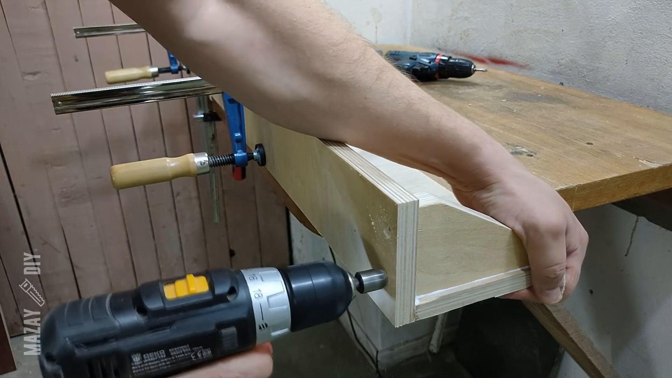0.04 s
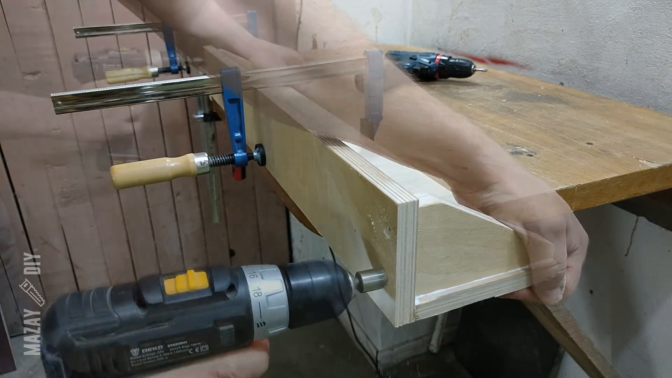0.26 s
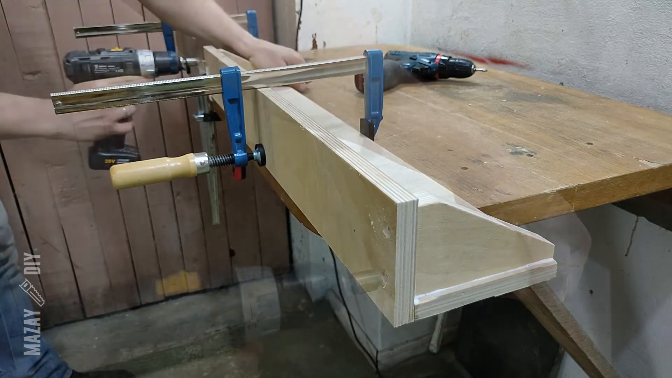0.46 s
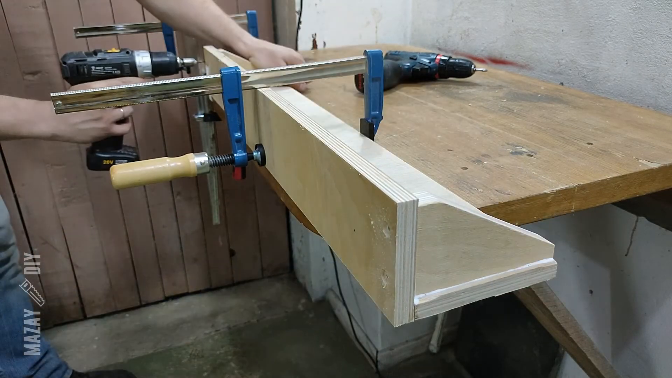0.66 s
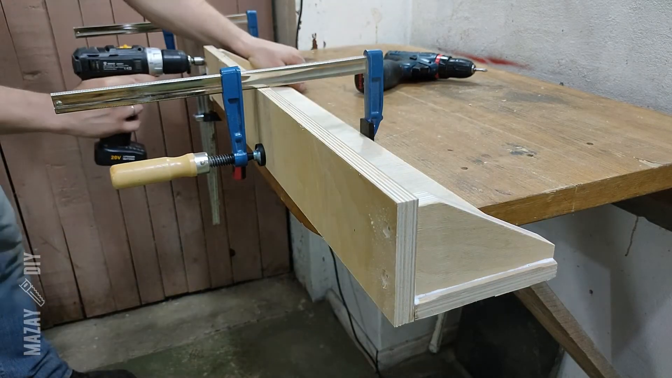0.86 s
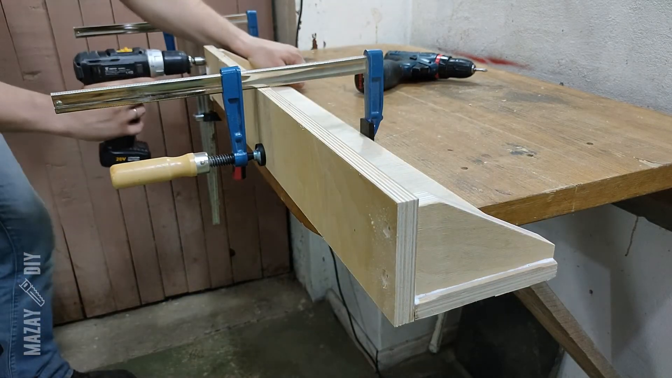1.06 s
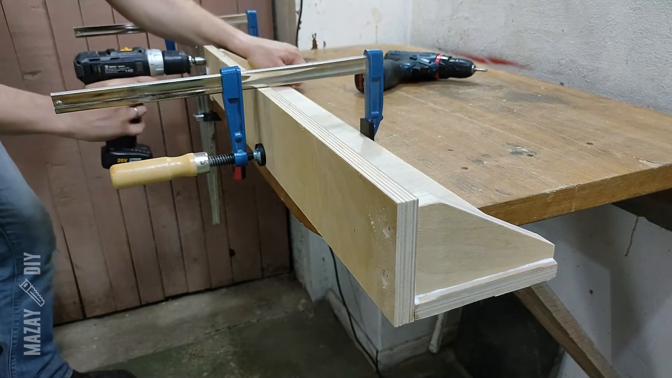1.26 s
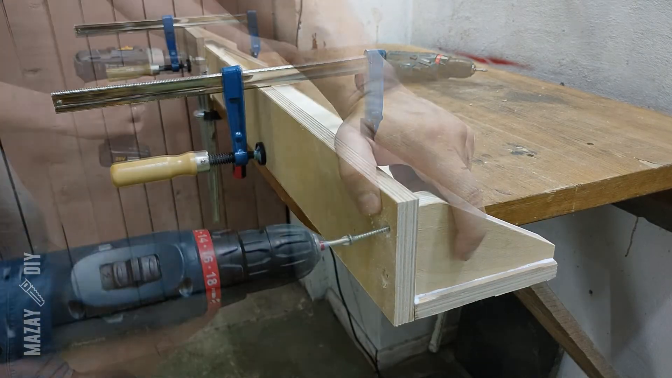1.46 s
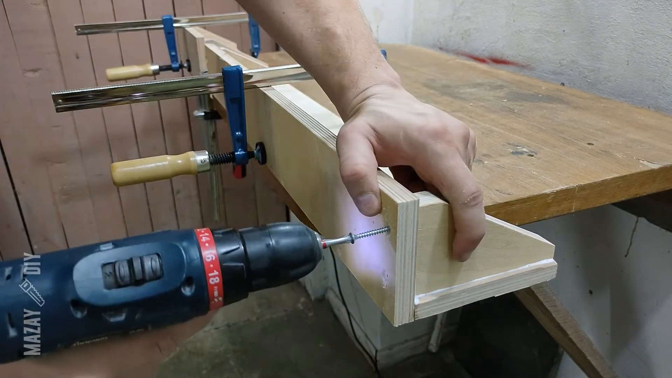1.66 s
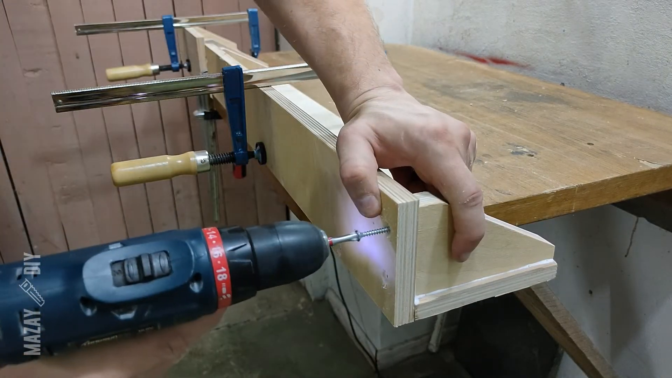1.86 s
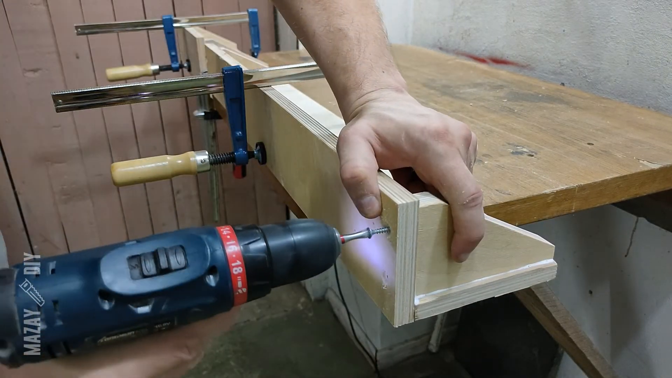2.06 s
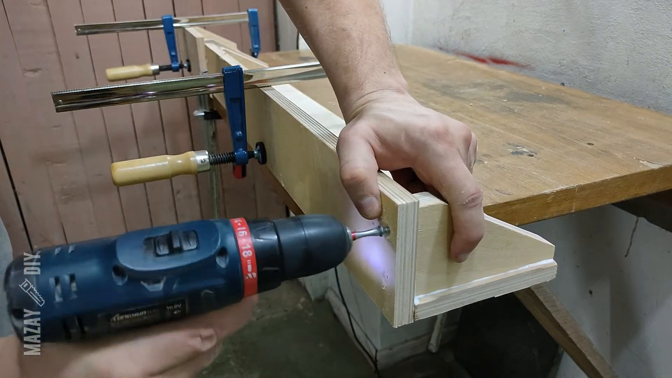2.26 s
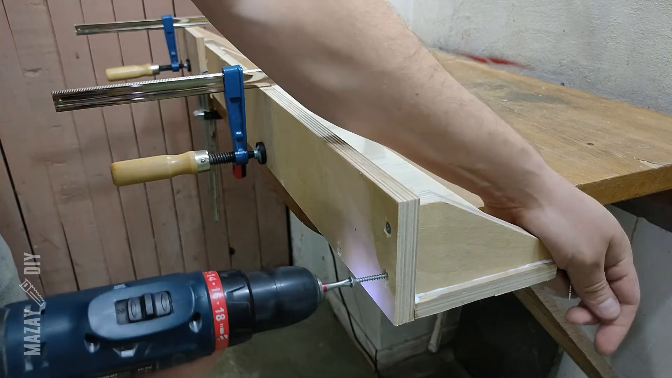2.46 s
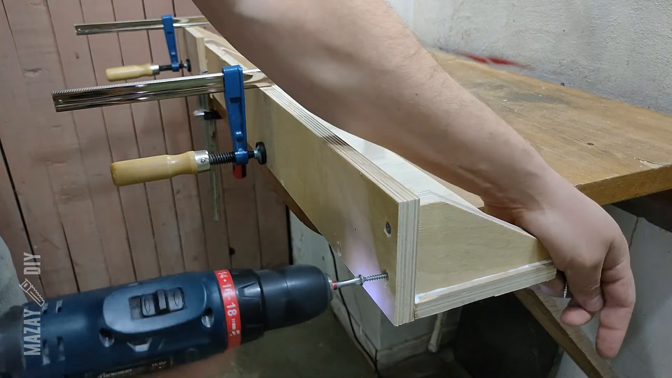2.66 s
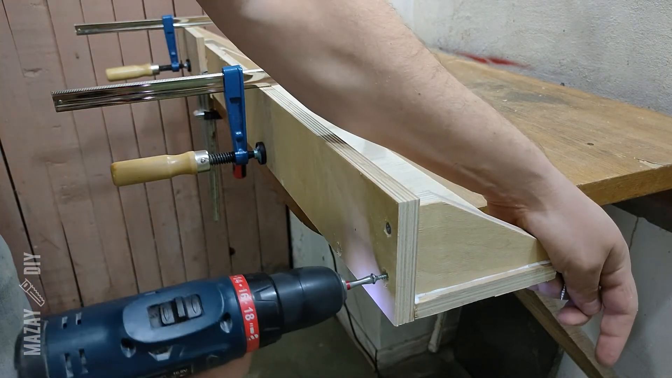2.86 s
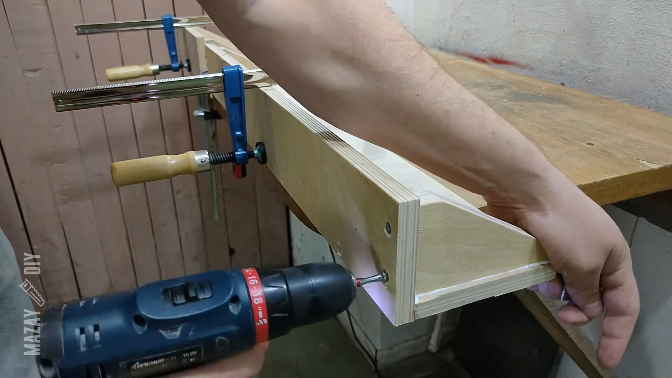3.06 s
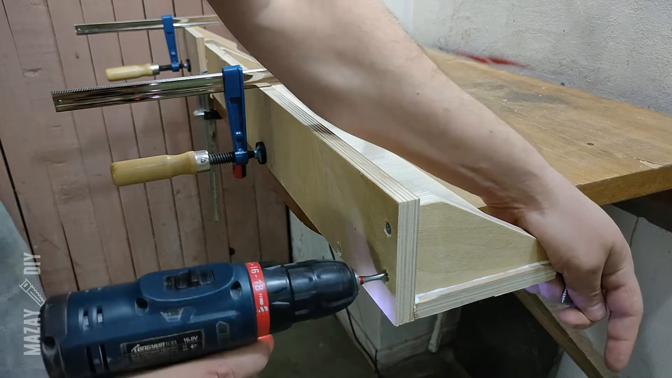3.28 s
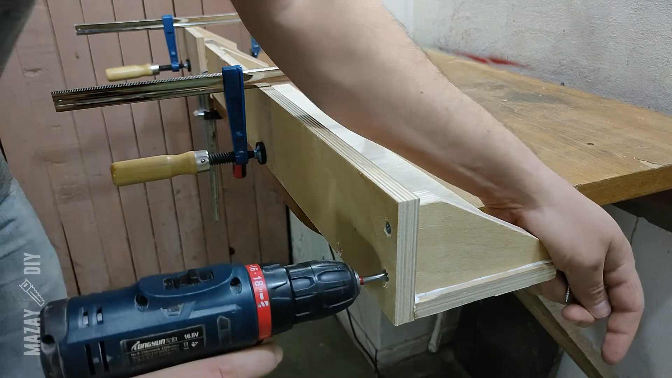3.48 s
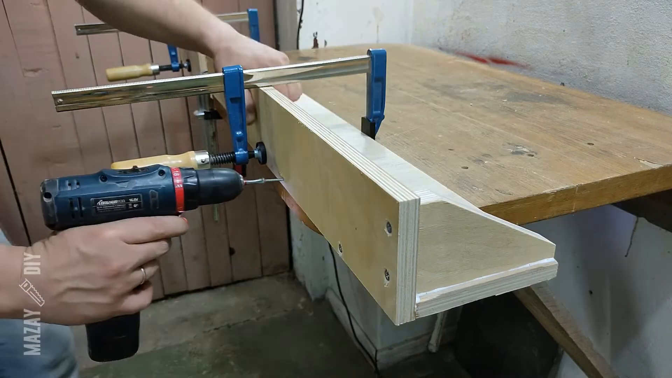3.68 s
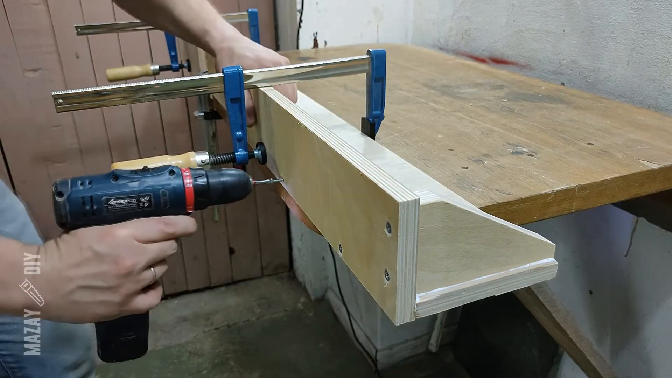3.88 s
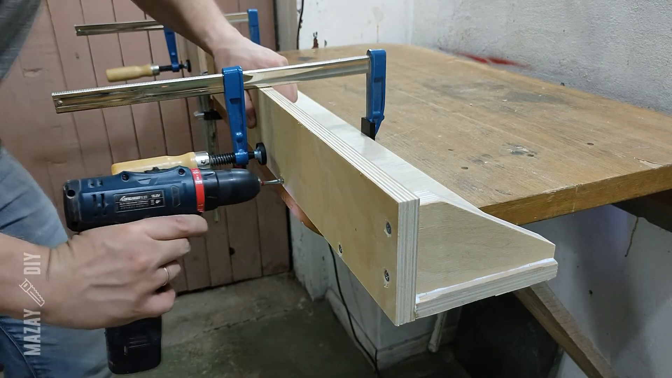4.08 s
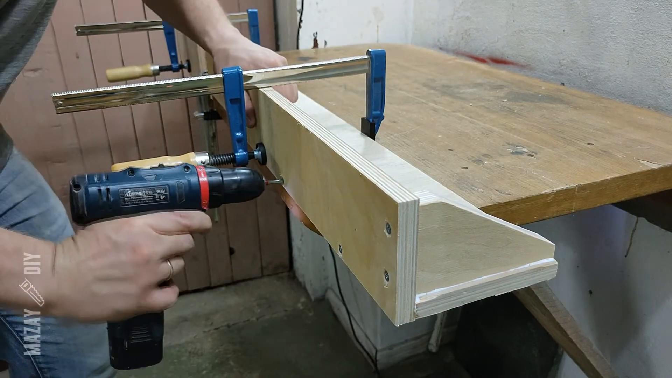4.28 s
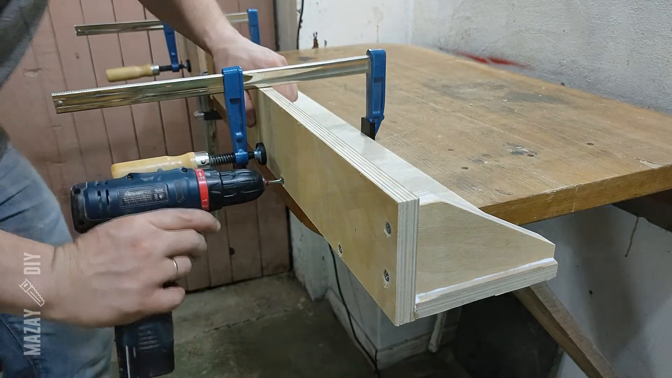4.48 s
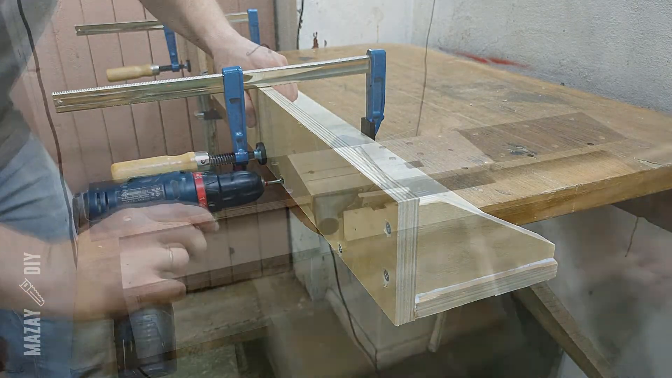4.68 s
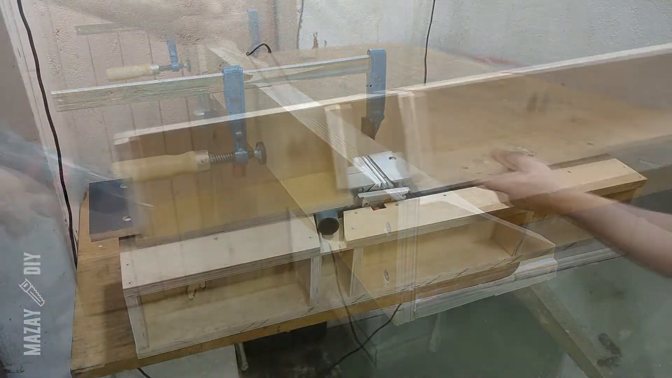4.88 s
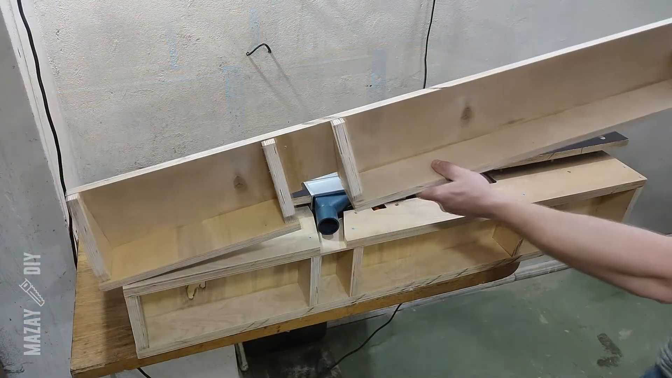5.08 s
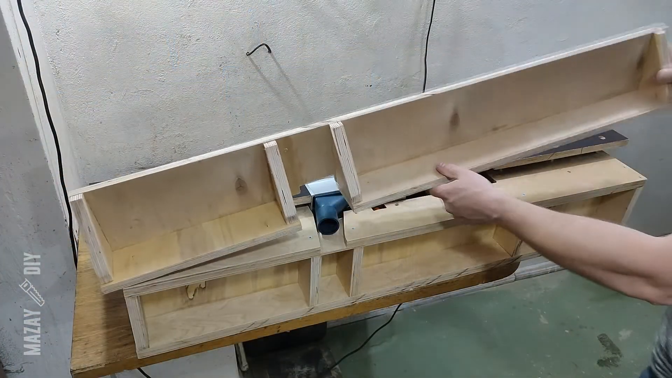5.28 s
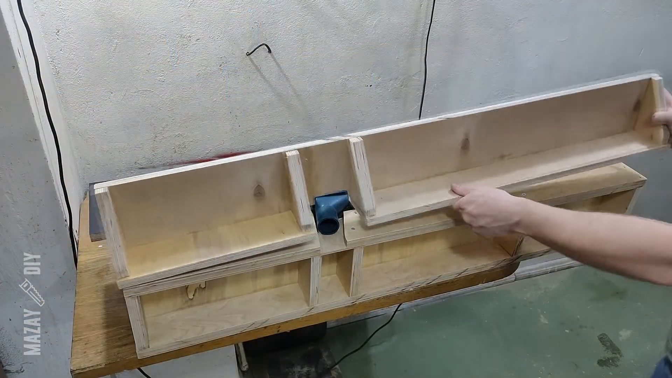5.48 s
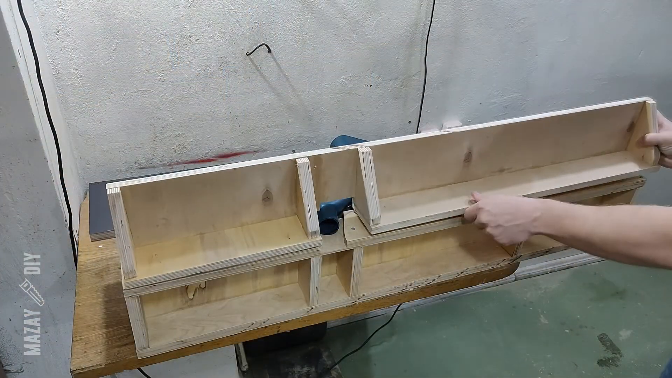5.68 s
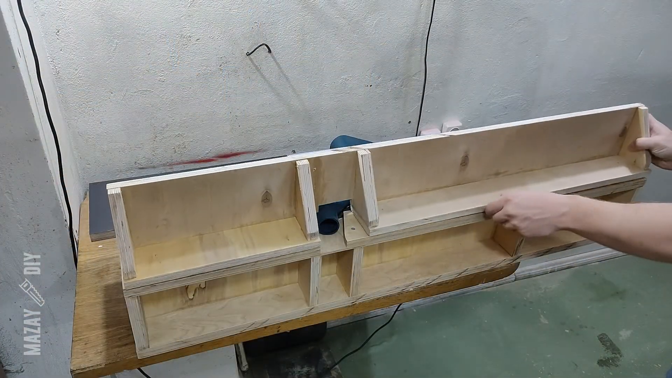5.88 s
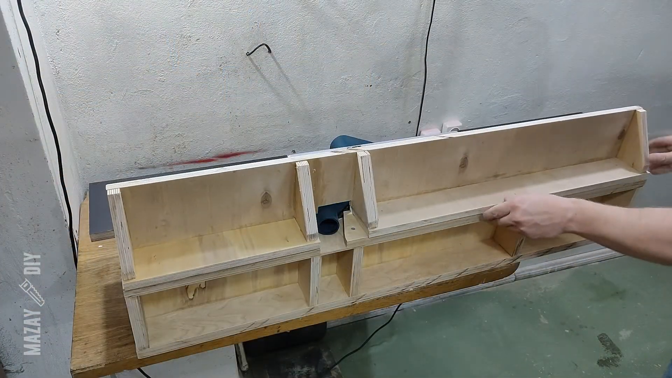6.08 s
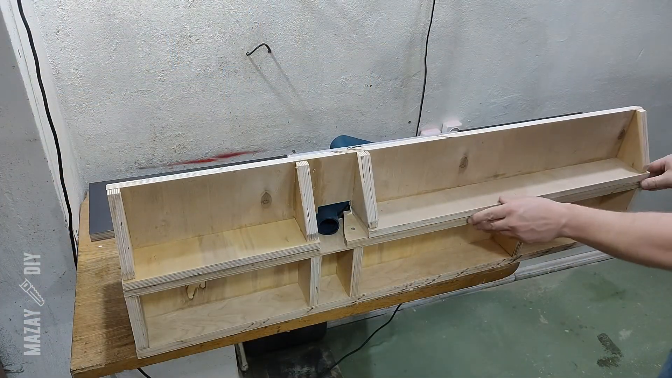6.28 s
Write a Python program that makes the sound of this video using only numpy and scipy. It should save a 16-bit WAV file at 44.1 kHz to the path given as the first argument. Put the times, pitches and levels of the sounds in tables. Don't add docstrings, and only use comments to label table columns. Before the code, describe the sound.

In a small, hard-walled workshop, a cordless drill finishes a hole, spins free with a bright whine, and bores again. An impact driver then runs three screws, its gear whine sinking under load; rapid hammer blows rattle on the second and third, with a short final tightening burst. Much quieter wooden bumps, a slide and one clear knock follow as a box is set down. Close stereo microphones, thin bass, soft crossfades.

```python
import sys
import numpy as np
from scipy import signal
from scipy.fft import rfft, irfft
from scipy.io import wavfile
from scipy.ndimage import uniform_filter1d

SR = 44100
rng = np.random.default_rng(int(sys.argv[2]) if len(sys.argv) > 2 else 0)


def decibels_to_gain(level_db):
    exponent = np.asarray(level_db, float) / 20
    return 10 ** exponent


def persist_wave(psi):
    counts = np.round(np.clip(psi, -1, 1) * 32767).astype(np.int16)
    wavfile.write(sys.argv[1], SR, np.atleast_2d(counts).T)


N = 279572
T = np.arange(N) / SR


def unit(x):
    return x / np.sqrt(np.mean(x ** 2))


def on_log(hz, rows):
    f, v = np.transpose(rows)
    return np.interp(np.log(np.maximum(hz, 1)), np.log(f), v)


def convolve(x, h):
    return signal.fftconvolve(x, h, axes=-1)[..., :N]


def colour(x, spectrum, size=4096):
    hz = np.arange(size // 2 + 1) * SR / size
    cepstrum = irfft(np.log(decibels_to_gain(on_log(hz, spectrum))))
    cepstrum[1:size // 2] *= 2
    cepstrum[size // 2 + 1:] = 0
    response = irfft(np.exp(rfft(cepstrum)))[:size // 2]
    return unit(convolve(np.atleast_2d(x), response[None]))


def split(x, hz, kind):
    return signal.sosfiltfilt(signal.butter(2, hz, kind, fs=SR, output="sos"), x)


def walk(rate_hz):
    hold = int(SR / rate_hz)
    steps = np.repeat(rng.standard_normal(N // 40), hold)[:N]
    return unit(uniform_filter1d(uniform_filter1d(steps, hold), hold))


def swell(start, full, fade, gone):
    rise = (T - start) / max(full - start, .001)
    fall = (gone - T) / max(gone - fade, .001)
    return np.clip(np.minimum(rise, fall), 0, 1)


def swells(rows):
    return np.sqrt(sum((swell(*times) * decibels_to_gain(db)) ** 2 for *times, db in rows))


# f/Hz, correlation/1
LIKENESS = [(250, 0.81), (640, 0.66), (1400, 0.092), (16000, 0.019)]


def spread(mid, side, hz):
    like = np.clip(on_log(hz, LIKENESS), 0, 1)
    return mid * np.sqrt(1 + like) + np.array([[1], [-1]]) * side * np.sqrt(1 - like)


def pair(x):
    mid, side = rfft(x)
    return irfft(spread(mid, side, np.arange(N // 2 + 1) * SR / N), N)


# f/Hz, T60/s
ROOM_T60 = [(250, 0.42), (700, 0.28), (2000, 0.34), (6000, 0.36), (14000, 0.22)]


def room(x, wet_db, left_lag=8):
    t = np.arange(SR // 2) / SR
    hz = np.arange(len(t) // 2 + 1) * SR / len(t)
    mid, side = rfft(rng.standard_normal((2, len(t))))
    both = spread(mid, side, hz)
    tail = 0
    for centre_hz in 125 * 2. ** np.arange(8):
        octave = np.clip(1 - np.abs(np.log2(np.maximum(hz, 1) / centre_hz)), 0, 1)
        band = irfft(octave * both, len(t))
        onset = np.clip((t - .002) / 0.0014, 0, 1)
        band = band * decibels_to_gain(-60 * t / on_log(centre_hz, ROOM_T60)) * onset
        tail = tail + band * np.sqrt(centre_hz / np.sum(band ** 2, axis=1, keepdims=True))
    response = tail / np.sqrt(np.sum(tail ** 2) / 2) * decibels_to_gain(wet_db)
    response[[0, 1], [left_lag, 0]] += 1
    return convolve(x, response) / np.hypot(1, decibels_to_gain(wet_db))


def clatter(turns, spectrum, repeat, tick_db):
    pattern = rng.standard_normal((2, 128))
    same = pattern[:, (turns % 1 * 128).astype(int)]
    fresh = rng.standard_normal((2, N)) * decibels_to_gain(tick_db * walk(300))
    scattered = pair(repeat * same + unit(fresh))
    standing = room(rng.standard_normal((1, N)), 7.0)
    return colour(scattered + 1.2 * standing, spectrum)


def whine(turns, db, flutter_db, lag_rad):
    phase = 2 * np.pi * (turns + rng.random()) + 0.22 * walk(54)
    gain = np.sqrt(2) / np.cos(lag_rad / 2) * decibels_to_gain(db + flutter_db * walk(25.04))
    return gain * np.sin([phase - lag_rad, phase])


# f/Hz, level/dB
FLOOR = [(120, -31.5), (200, -12.5), (334, -4.5), (696, -0.5), (1650, -11), (2420, -10.5), (3310, -17),
         (16000, -20.5)]


def room_floor():
    return colour(pair(rng.standard_normal((2, N))), FLOOR) * decibels_to_gain(-88.5)


PULL_OUT_S, PLUNGE_S = (.28, .36), (.9, 1.05)
FREE_HZ, BORING_HZ = 348.5, 338
SPIN_UP_S, BITE_S, SAG_HZ_PER_S = .15, .045, 7


def shaft_hz():
    climb = 1 - np.exp(-np.maximum(T - PULL_OUT_S[0], 0) / SPIN_UP_S)
    since = np.maximum(T - PLUNGE_S[0] - .03, 0)
    free = np.exp(-since / BITE_S)
    sag = SAG_HZ_PER_S * (.45 - np.minimum(since, .62)) * (1 - free)
    return BORING_HZ + (FREE_HZ - BORING_HZ) * climb * free + sag


# f/Hz, level/dB
DRILL_BODY = [(120, -85.5), (200, -60), (305, -22), (340, -5), (448, -30), (899, -33), (1040, -30),
              (1100, -15.5), (3190, -17.5), (4770, -23), (7140, -15.5), (12800, -22.5), (16000, -24.5)]


def drill_motor(turns, level):
    return clatter(turns, DRILL_BODY, .5, 1.2) * level * decibels_to_gain(.6)


# f/Hz, level/dB
BIT_IN_WOOD = [(220, -18), (380, -3), (526, -1.5), (575, -6.5), (978, -3), (1070, -6.5), (1460, -9.5),
               (1600, -7), (1820, -10.5), (4000, -8), (5200, -40.5), (8800, -120)]
# start t/s, full t/s, fade t/s, gone t/s, level/dB
BORING = [
    (-.1, 0, 0.27, 0.32, -47),
    (.775, .79, 1.533, 1.68, -47.5),
]
IDLE_BIT_DB = -22


def bit(turns, level):
    wood = clatter(turns / 14, BIT_IN_WOOD, 0.31, 2.8) * decibels_to_gain(0.97 * walk(30) + 9.0)
    return wood * np.hypot(swells(BORING), level * decibels_to_gain(IDLE_BIT_DB))


# start t/s, full t/s, fade t/s, gone t/s, level/dB
LEANING = [
    (-.1, 0, .29, .346, -31),
    (.35, .45, 0.44, 0.73, -37.5),
    (.68, .74, .77, .79, -51),
    (.8, 1.2, 1.43, 1.68, -29),
]


def shaft_hum(turns):
    return whine(turns, 0, 0.89, 0.21) * swells(LEANING)


DRILL_ORDERS = [2, 2.59, 2.79, 3, 4.66, 8.33, 9, 10.33, 15, 18, 21, 23, 24, 27, 30, 32, 39]
WHINE_NEAR = [-30, -17, -35, -17, -16, -19, -26, -25, -25, -15, -18, -18, -24, -26, -24, -26, -24]
WHINE_FREE = [-30, -35, -35, -16, -35, -30, -13, -30, -21, -17, -12, -30, -19, -18, -18, -24, -25]
WHINE_FAR = [-19, -35, -13, -18, -17, -26, -18, -21, -26, -20, -17, -17, -19, -26, -26, -22, -28]


def drill_whines(turns, level):
    out = 0
    for order, near, free, far in zip(DRILL_ORDERS, WHINE_NEAR, WHINE_FREE, WHINE_FAR):
        db = np.interp(T, [*PULL_OUT_S, *PLUNGE_S], [near, free, free, far])
        out = out + level * whine(order * turns, db, 2.3, min(order / 5, 1.6))
    return out


# start t/s, full t/s, fade t/s, gone t/s, level/dB
MOTOR_SHOTS = [
    (-.1, 0, 0.26, 0.98, -33),
    (.55, 1.05, 1.472, 1.678, -37),
]
OPENING_DB, OPENING_S = 4.5, 0.0064


def drill():
    level = swells(MOTOR_SHOTS)
    turns = np.cumsum(shaft_hz()) / SR
    out = drill_motor(turns, level) + bit(turns, level) + shaft_hum(turns) + drill_whines(turns, level)
    return out * decibels_to_gain(OPENING_DB * np.exp(-T / OPENING_S))


# t/s, level/dB
THUMPS = [
    (0, -56),
    (3.165, -63),
    (4.27, -77),
    (4.585, -73),
    (5.865, -84),
]
THUMP_S = .02


def low_thumps():
    return sum(decibels_to_gain(db) * (T >= s) * np.exp(-np.maximum(T - s, 0) / THUMP_S) for s, db in THUMPS)


# f/Hz, level/dB
DRIVER_BODY = [(120, -67), (200, -37), (316, -7), (579, -5.5), (659, -6), (933, -7.5), (1270, -4.5),
               (1650, -7.5), (2290, -0.5), (2610, -2.5), (7010, -11.5), (10900, -22), (15100, -20.5),
               (16000, -23.5)]
SHAFT_SHARE = .322
GROWL_DB, FAN_DB = (1.5, 5.5), (6.5, 10.5)


def driver_motor(mesh, load):
    noise = clatter(mesh * SHAFT_SHARE / 3, DRIVER_BODY, .6, 1.2)
    low = split(noise, 1000, "low")
    top = split(noise, 8000, "high")
    low_db, top_db = (free + (stalling - free) * load for free, stalling in (GROWL_DB, FAN_DB))
    return noise + low * (decibels_to_gain(low_db) - 1) + top * (decibels_to_gain(top_db) - 1)


def sweep_db(hz, centre_hz, width_hz, on_db, off_db):
    return off_db + (on_db - off_db) * np.exp(-((hz - centre_hz) / width_hz) ** 2)


# multiple of mesh/1, level/dB
GEAR_SIDE_TONES = [(.25, -19), (.5, -18), (1.354, -19), (3, -22), (4, -26)]
# (centre Hz, width Hz, on dB, off dB re clatter)
MESH_PEAK, OCTAVE_PEAK, SHAFT_PEAK = (2330, 150, -3.5, -12), (4050, 300, -7, -22), (635, 80, -3.5, -21)


def gear_tones(mesh, hz):
    tones = whine(mesh, sweep_db(hz, *MESH_PEAK), 1.8, 1.5)
    tones += whine(2 * mesh, sweep_db(2 * hz, *OCTAVE_PEAK), 2.2, 1.5)
    shaft = whine(SHAFT_SHARE * mesh, sweep_db(SHAFT_SHARE * hz, *SHAFT_PEAK), 4.0, .6)
    tones += shaft * decibels_to_gain(3.5 * walk(70))
    return tones + sum(whine(k * mesh, db, 4.0, 1.2) for k, db in GEAR_SIDE_TONES)


# t/s, f/Hz
MESH = [
    [(1.8, 1250), (1.95, 1700), (2.04, 2320), (2.1, 2345), (2.19, 2350), (2.25, 2215), (2.32, 1955),
     (2.46, 1800)],
    [(2.53, 1250), (2.6, 1800), (2.68, 2440), (2.75, 2430), (2.82, 2390), (2.96, 2205), (3.1, 1950),
     (3.17, 1900)],
    [(3.68, 1500), (3.72, 2250), (3.79, 2495), (3.95, 2395), (4.03, 2305), (4.11, 2120), (4.19, 2017),
     (4.265, 1980)],
]
# start t/s, full t/s, fade t/s, gone t/s, level/dB
SQUEEZES = [
    (1.66, 1.85, 2, 2.01, -45),
    (1.93, 2.03, 2.395, 2.473, -39),
    (2.465, 2.72, 3.8, 3.235, -39.5),
    (3.665, 3.72, 5.3, 4.065, -42.5),
    (3.8, 4.1, 4.22, 4.245, -39),
    (4.24, 4.262, 4.2, 4.42, -35),
]
UNLOADED_HZ, STALLING_HZ = 2400, 1900
SPIN_UP_SHARE = .35


def driver():
    whining = sum(swell(m[0][0], m[0][0] + 0.024, m[-1][0] - .025, m[-1][0]) for m in MESH)
    biting = sum(swell(m[1][0] + .03, m[2][0] + .03, m[-1][0], m[-1][0] + .02) for m in MESH)
    hz = np.interp(T, *np.concatenate(MESH).T)
    mesh = np.cumsum(hz) / SR
    load = biting * np.clip((UNLOADED_HZ - hz) / (UNLOADED_HZ - STALLING_HZ), 0, 1)
    motor = driver_motor(mesh, load) * decibels_to_gain(2.5 + 0.71 * walk(12))
    tones = whining * np.maximum(biting, SPIN_UP_SHARE) * gear_tones(mesh, hz)
    return swells(SQUEEZES) * (motor + tones)


# start t/s, let-go t/s, blow level/dB, rattle level/dB, run-down t/s
BURSTS = [
    (3.171, 3.354, -24, -28.5, 0.028),
    (4.268, 4.443, -23, -29, 0.026),
    (4.588, 4.688, -24.5, -28.5, 0.046),
]
# first f/Hz, top f/Hz
BLOW_RATES = [(112, 124), (117, 125.7), (120, 125)]
RATE_GAIN_PER_S = 80
ENGAGE_S, FIRST_BLOWS_DB, FIRST_BLOWS_S, TIGHTEN_DB, RATTLE_SAG_DB = .012, 6, .022, 4.5, 3


def hammer_drive():
    rate, thump, rattle = np.zeros((3, N))
    for (start, stop, blow_db, rattle_db, down_s), (first, top) in zip(BURSTS, BLOW_RATES):
        since, on = np.maximum(T - start, 0), T >= start
        rate[on] = np.minimum(first + RATE_GAIN_PER_S * since, top)[on]
        tight = since / (stop - start)
        accent_db = FIRST_BLOWS_DB * np.exp(-since / FIRST_BLOWS_S)
        thump_db = blow_db + accent_db + TIGHTEN_DB * tight
        steel_db = rattle_db + accent_db - RATTLE_SAG_DB * (tight - .5)
        thump += swell(start - .006, start + ENGAGE_S, stop, stop + down_s) * decibels_to_gain(thump_db)
        rattle += swell(start - .006, start + 0.0099, stop, stop + down_s) * decibels_to_gain(steel_db)
    return rate, thump, rattle


def blow_turns(rate):
    turns = np.cumsum(np.maximum(rate, 100) * (1 + .004 * walk(100))) / SR
    starts = [int(burst[0] * SR) + 60 for burst in BURSTS]
    current = np.maximum(np.searchsorted(starts, np.arange(N) + 60) - 1, 0)
    return turns - turns[starts][current]


# f/Hz, level/dB
BOARD = [(120, -73.5), (200, -40.5), (367, -6.5), (419, -16), (493, -10.5), (542, -10), (603, -10),
         (801, -7), (857, -0.5), (929, -9.5), (1270, 1), (1490, -5), (1920, -6.5), (5000, -26),
         (6500, -64.5), (11000, -120)]
# f/Hz, level/dB
ANVIL = [(1180, -24.5), (2000, -2), (2530, -7.5), (2740, -5.5), (4690, -18), (6530, -8), (8120, -8),
         (10800, -17.5), (15100, -15), (16000, -18)]
SHOT_FADES_S = 4.73, 5.108


def hammer():
    rate, thump, rattle = hammer_drive()
    turns = blow_turns(rate)
    at = np.flatnonzero(np.diff(np.floor(turns)) > 0)
    blows = np.zeros(N)
    blows[at] = -decibels_to_gain(2.2 * rng.standard_normal(len(at)))
    after = .4 + np.exp(-(turns % 1) / .25)
    board_grind, steel_grind = (pair(rng.standard_normal((2, N)) * after) for _ in range(2))
    board = colour(unit(blows) + .95 * board_grind, BOARD)
    steel = colour(0.15 * unit(blows) + steel_grind, ANVIL)
    direct = board * thump + steel * rattle * decibels_to_gain(5.0)
    near = room(direct * (T < 4), 2.0, left_lag=0)
    far = room(direct * (T > 4), 4.4, left_lag=9)
    return near + far * swell(0, 1, *SHOT_FADES_S)


def ring(x, hz, width_hz):
    peak = signal.iirpeak(hz, hz / width_hz, SR)
    return signal.lfilter(*peak, signal.lfilter(*peak, x))


# t/s, peak level/dB, ring f/Hz
BUMPS = [(4.984, -56, 698), (4.99, -46.5, 452), (5.014, -45.5, 403), (5.034, -48.5, 444),
         (5.069, -55.5, 350), (5.199, -68, 692), (5.349, -58, 463), (5.371, -49, 649), (5.394, -48, 502),
         (5.424, -54, 740), (5.507, -61, 646), (5.579, -48, 460), (5.629, -67, 503), (5.831, -61, 654)]
# t/s, peak level/dB, ring f/Hz, contact t/s, edge level/dB
KNOCKS = [
    (5.533, -58, 687, 0.0053, -32),
    (5.555, -46.5, 664, 0.0031, -19),
    (5.865, -35.5, 775, 0.003, -2),
    (5.874, -47, 500, 0.0049, -10),
    (5.885, -41.5, 807, 0.0068, -9),
    (5.867, -44, 1500, .004, -20),
    (5.869, -51.5, 2280, 0.0045, -18),
]
# f/Hz, level/dB
BOX = [(130, -46), (220, -29), (300, -2.5), (397, -5), (442, -4.5), (478, -3), (694, -4.5), (798, 1.5),
       (1020, -17), (1200, -10.5), (2560, -34.5), (3180, -51), (9000, -74), (11700, -94), (19800, -120)]
SOFT_CONTACT_S, SOFT_EDGE_DB = 0.0069, -24.5


def box_hits():
    panel, whole, size = np.zeros(N), np.zeros(N), SR // 8
    t = np.arange(size) / SR
    hits = [(*bump, SOFT_CONTACT_S, SOFT_EDGE_DB) for bump in BUMPS] + list(KNOCKS)
    for s, db, hz, contact_s, edge_db in hits:
        grit = rng.standard_normal(size)
        push = grit * np.exp(-t / contact_s) * np.minimum(t / contact_s * 4, 1)
        tone = ring(push, hz, 108.0)
        i = int(s * SR)
        panel[i:i + size] += tone * decibels_to_gain(db - 2.0) / np.abs(tone).max()
        whole[i:i + size] += push * decibels_to_gain(db + edge_db)
    return room(panel + colour(whole, BOX) * decibels_to_gain(-57.5), 4.8)


# f/Hz, level/dB
AIR = [(710, -28), (1200, 3.5), (1640, -7), (1830, 1), (3830, -10), (5590, -22), (6950, -11), (16000, -41)]
# start t/s, full t/s, fade t/s, gone t/s, level/dB
SLIDES = [
    (4.99, 5.03, 4.93, 5.37, -75),
    (5.18, 5.2, 5.22, 5.7, -82),
    (5.31, 5.36, 5.42, 5.48, -69),
    (5.862, 5.866, 5.77, 6.05, -70),
]


def box_slides():
    hiss = colour(pair(rng.standard_normal((2, N)) * decibels_to_gain(2.5 * walk(60))), AIR)
    return hiss * swells(SLIDES)


def scene():
    return room_floor() + drill() + driver() + hammer() + box_hits() + box_slides()


def band_limit(x):
    return signal.sosfilt(signal.butter(12, 16490, fs=SR, output="sos"), x)


def record(dry):
    x = signal.sosfilt(signal.butter(4, 260, "high", fs=SR, output="sos"), dry)
    x = x + split(x, 12000, "high") * np.array([[.35], [-.3]])
    hum = uniform_filter1d(np.abs(split(x[0], 660, "low")), 600)
    rumble = unit(split(rng.standard_normal(N), 150, "low"))
    x = x + (decibels_to_gain(-48) * hum + low_thumps()) * rumble * np.array([[1.25], [1]])
    x = signal.sosfilt(signal.ellip(10, .2, 70, 15850, fs=SR, output="sos"), x)
    return band_limit(x)


dry = scene()
out = record(dry)
persist_wave(out)
```